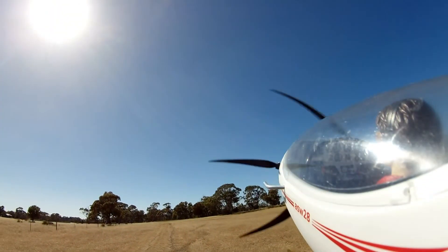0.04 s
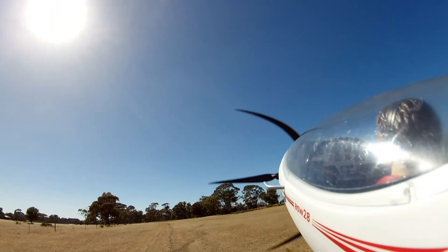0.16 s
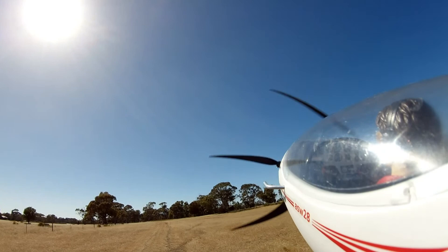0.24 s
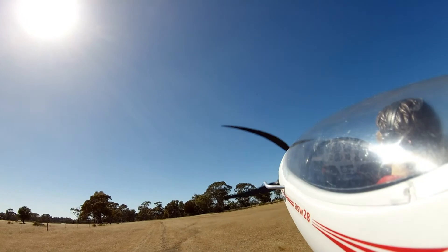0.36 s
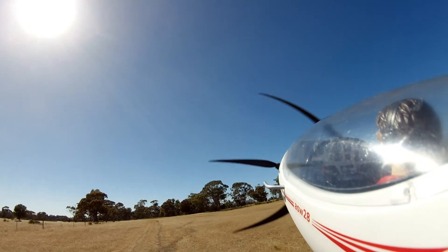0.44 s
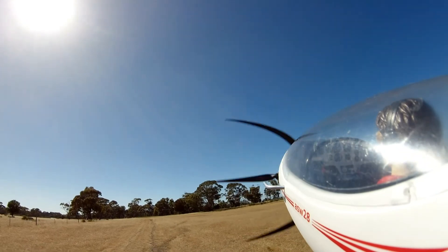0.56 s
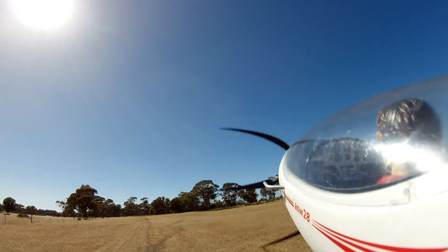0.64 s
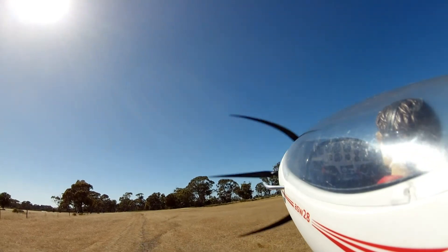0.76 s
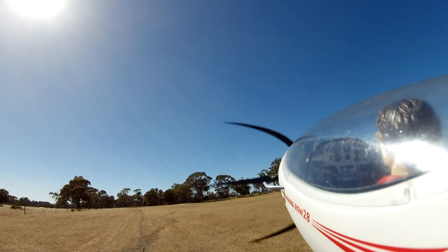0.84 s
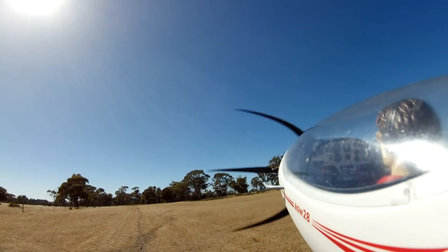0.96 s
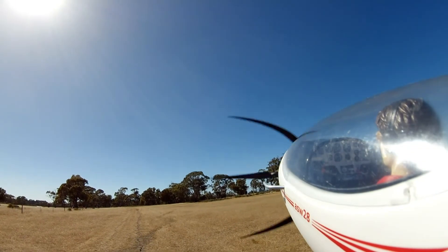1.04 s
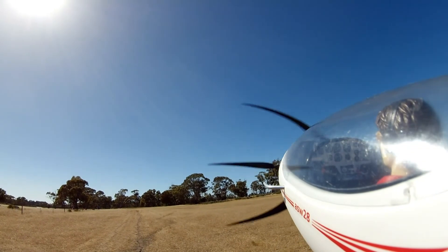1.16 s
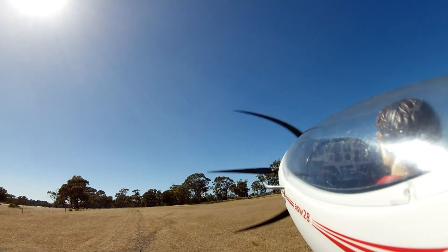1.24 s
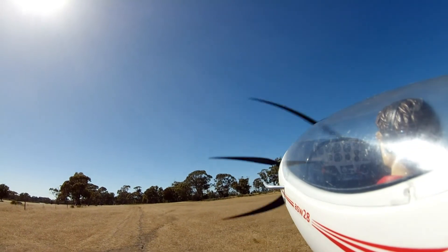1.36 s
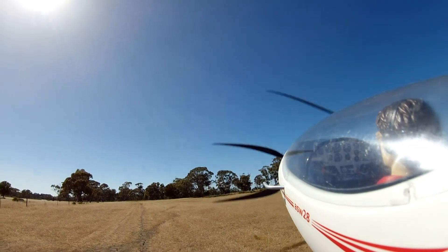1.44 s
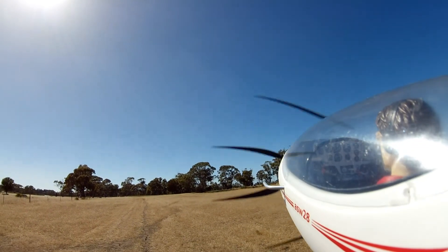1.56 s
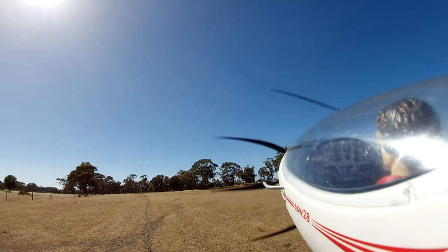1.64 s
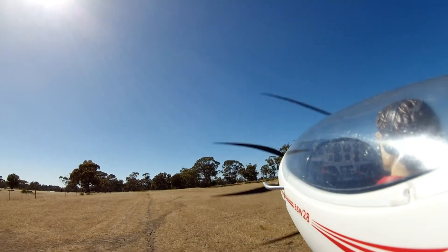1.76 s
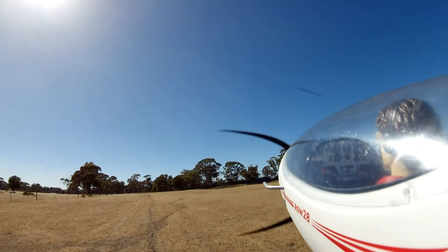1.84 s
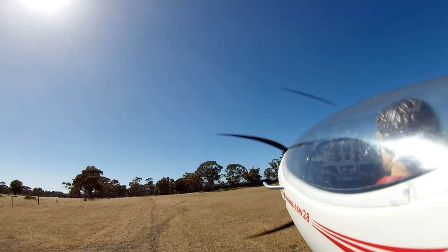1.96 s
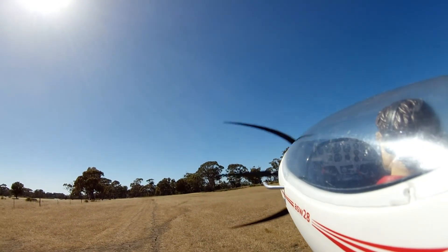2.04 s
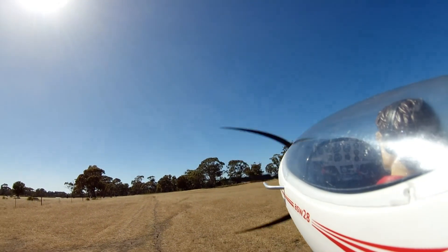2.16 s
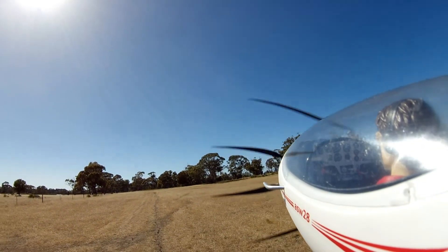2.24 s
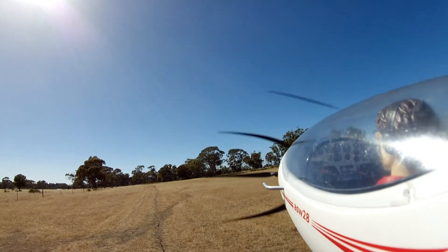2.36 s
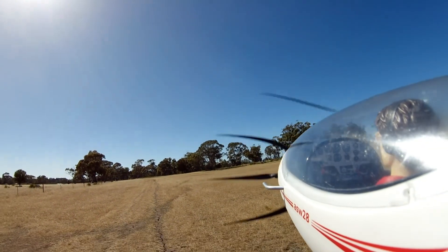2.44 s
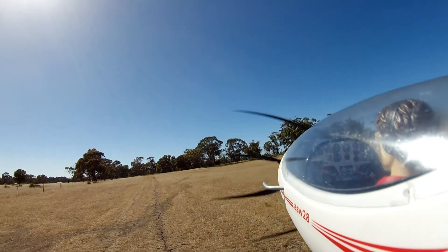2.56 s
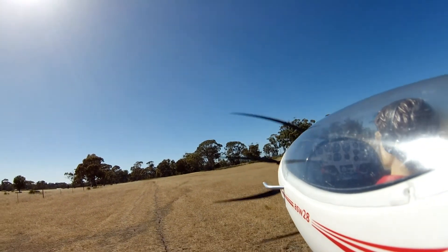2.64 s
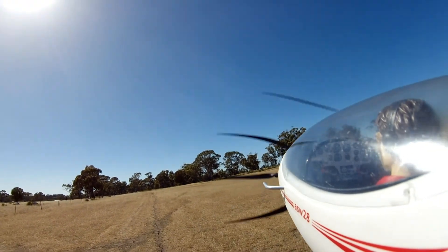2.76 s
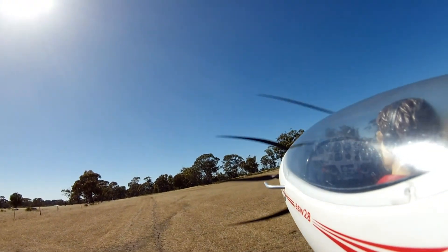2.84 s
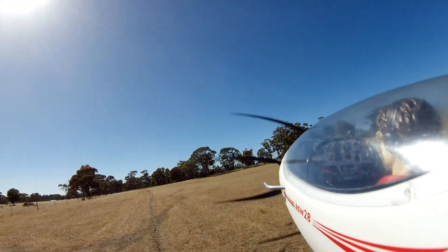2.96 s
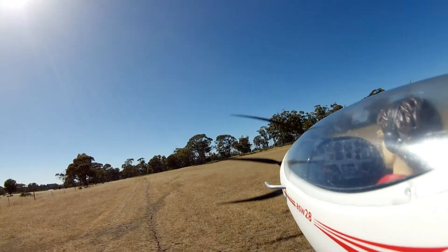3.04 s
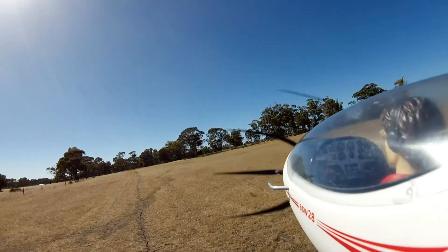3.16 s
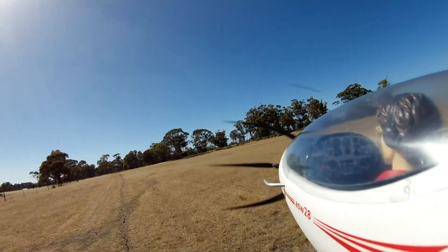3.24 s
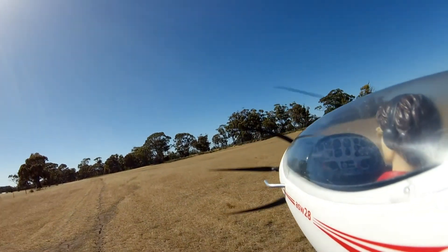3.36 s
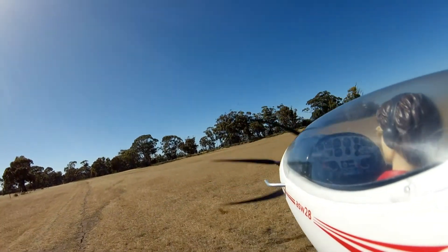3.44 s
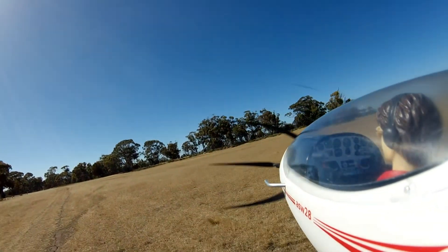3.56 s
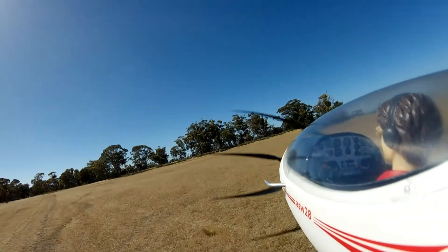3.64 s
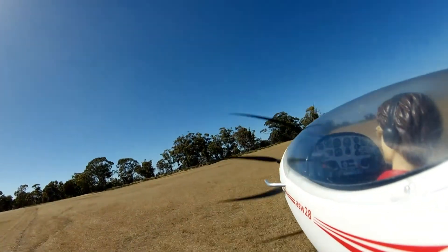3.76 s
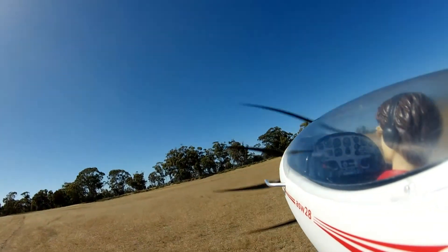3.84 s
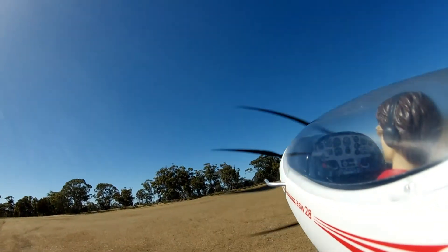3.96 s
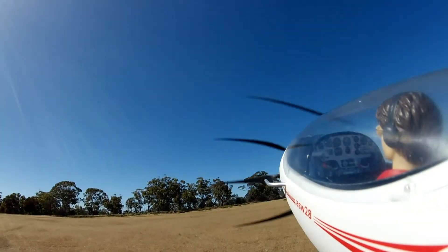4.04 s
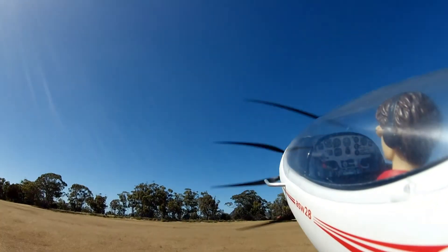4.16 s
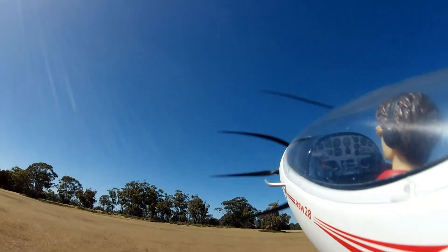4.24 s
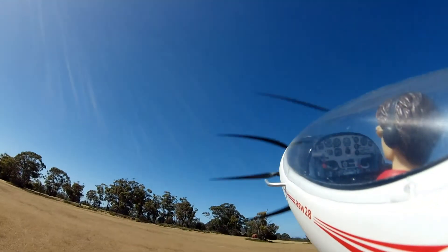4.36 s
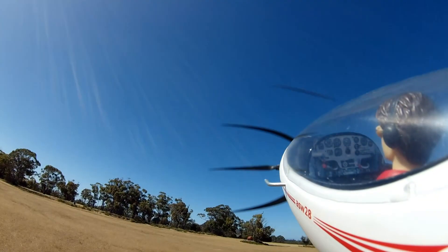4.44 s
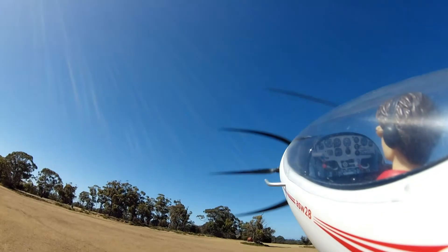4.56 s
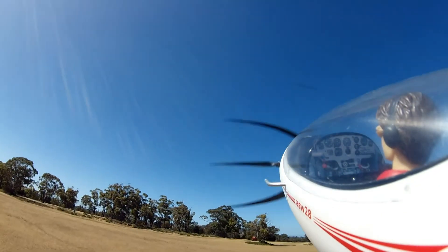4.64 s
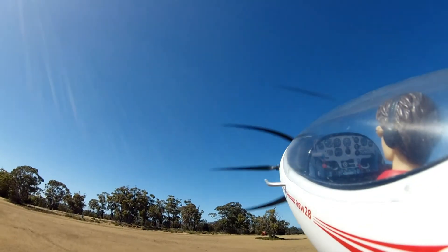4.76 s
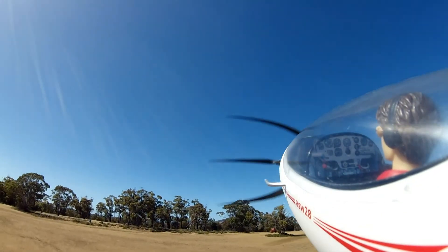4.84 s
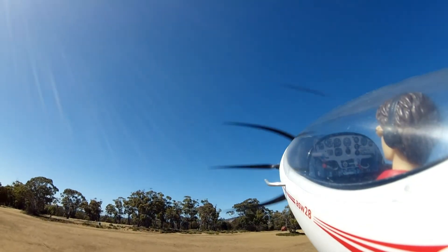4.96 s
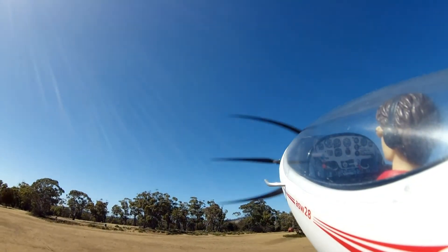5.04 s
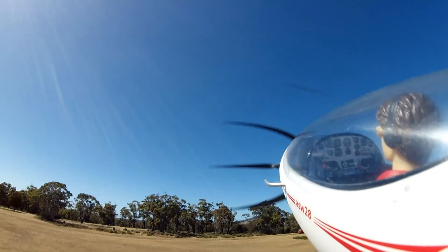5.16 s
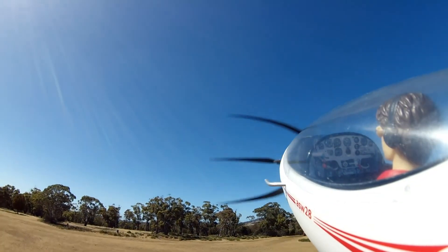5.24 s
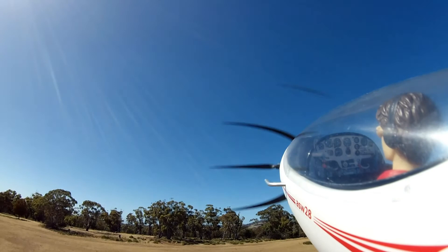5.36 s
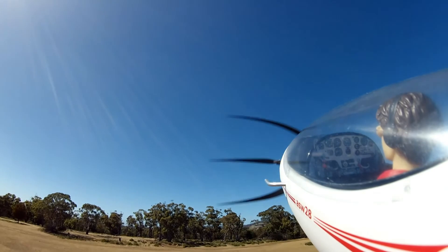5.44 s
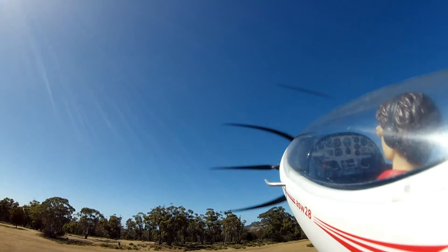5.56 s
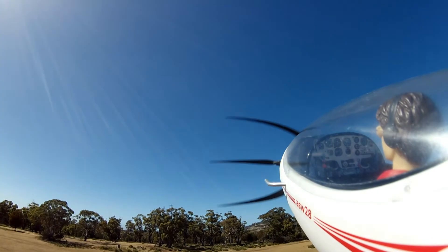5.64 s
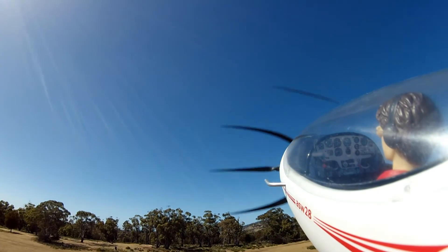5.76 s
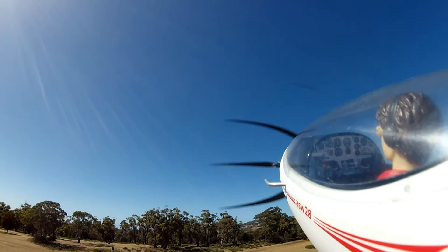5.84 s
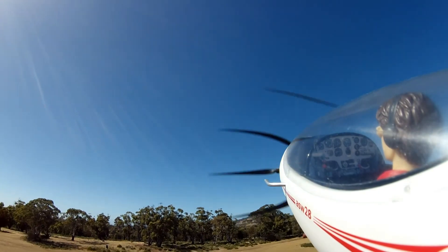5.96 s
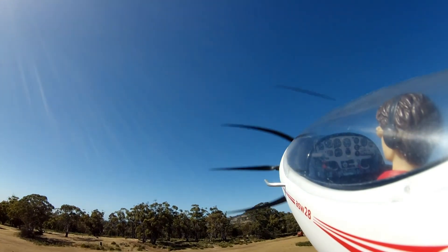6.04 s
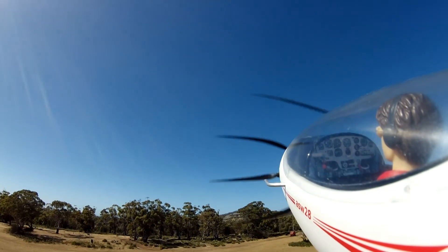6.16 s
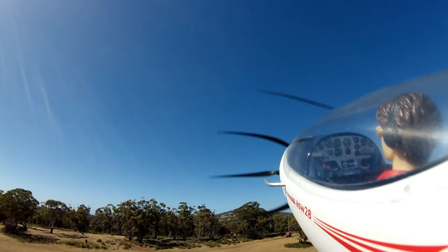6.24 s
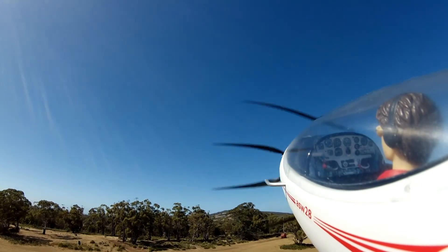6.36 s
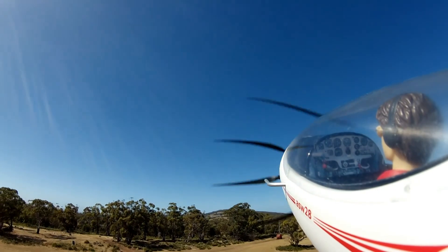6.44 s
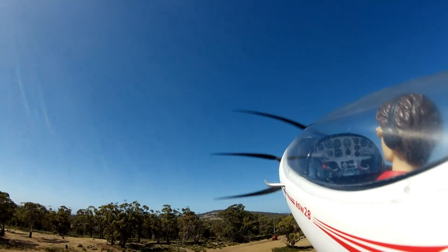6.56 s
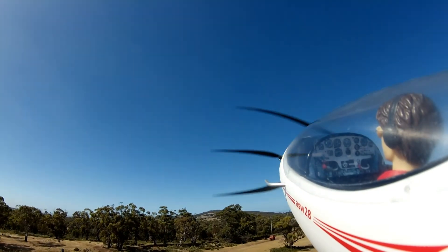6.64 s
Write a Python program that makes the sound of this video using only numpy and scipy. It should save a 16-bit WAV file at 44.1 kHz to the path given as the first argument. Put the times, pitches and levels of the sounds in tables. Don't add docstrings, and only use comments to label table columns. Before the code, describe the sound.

The microphone sits inside a small case on the wing of an electric model glider in an open field, so everything is close, dull and short of treble. At 0 s there is only faint air; by 0.5 s it swells into a soft fluttering rush, with a very short rising motor whine. A small hollow knock sounds at 1.15 s as the craft rolls. The rush gets louder and its flutter faster from 1.5 s, and again at 2.3 s, when a steady low-mid propeller hum enters. Around 3 s it lifts off, with strong roar, frame shudder and gusts. From 3.6 to 4.2 s buzzing wake slaps come raggedly. The hiss eases between about 4 and 5 s as it rolls and climbs. After 5 s a rougher, steadier propeller buzz pulses within the muffled wind until the abrupt end near 6.7 s.

```python
import sys
import numpy as np
from scipy import signal
from scipy.fft import rfft, irfft
from scipy.io import wavfile
from scipy.ndimage import uniform_filter1d

SR = 44100
rng = np.random.default_rng(int(sys.argv[2]) if len(sys.argv) > 2 else 0)


def dump(signal):
    limited = np.clip(np.atleast_2d(signal).T, -1, 1)
    pcm = np.round(limited * 32767).astype(np.int16)
    wavfile.write(sys.argv[1], SR, pcm)


def undo_db(level):
    steps = np.asarray(level, float) / 20
    return 10 ** steps


N = 295029
TIME = np.arange(N) / SR
FREQ = np.arange(N // 2 + 1) * SR / N + 1e-3

AIR_BANDS_HZ = [
    (40, 120),
    (320, 420),
    (920, 1100),
    (1900, 2600),
    (3200, 5500),
]
# frequency in Hz, level in dB per Hz.
PORT_TONE = [(18, -63), (30, -53), (130, -17.5), (201, -7), (240, -3.5), (420, 1), (650, -1.5), (1000, -5),
             (1500, -6)]
# frequency in Hz, level in dB.
CASE_TONE = [(1500, -1), (2000, -12), (2400, -12), (2900, -18.5), (3800, -21), (5000, -32.5), (6000, -47),
             (6500, -63), (7000, -56), (7600, -63), (8100, -56), (9300, -57.5), (10500, -70.5),
             (16000, -94.5)]
# level on the ground in dB, change at lift-off in dB,
# change in the climb in dB, share of a lull that is felt (0-1.5).
AIR_LEVELS = [
    (-10, -8.5, -2.5, 0.7),
    (9, 0, -5, 0.02),
    (7.5, 1.5, -0.5, 1.12),
    (-1.5, 0, 0.2, 1.05),
    (-9, -.5, 0.5, 0.8),
]
LIFT_S, LIFT_LENGTH_S = 3.0, 0.18
CLIMB_S, CLIMB_LENGTH_S = 4.41, 0.37
# start in seconds, slipstream hiss in dB,
# flutter rate in Hz, flutter depth (0-1).
THROTTLE_STEPS = [
    (0, -60.5, 36, 0),
    (.13, -56.5, 38, 0.04),
    (.52, -51.5, 43, 0.23),
    (1.0, -51, 48.5, 0.25),
    (1.47, -47, 58, 0.17),
    (2.3, -42, 72, 0.27),
    (3.03, -41, 145.5, 0.2),
    (3.8, -40.5, 145.5, 0.02),
]
SPOOL_S = .1
# start in seconds, length in seconds, edge in seconds,
# drop of the hiss in dB.
SLIPSTREAM_LULLS = [
    (1.337, 0.2, .04, 0.5),
    (2.716, 0.099, .05, 0.5),
    (3.808, 0.11, .05, 2),
    (4.006, 1, 0.089, 4.5),
    (4.063, 0.057, 0.014, 1.5),
    (4.24, .06, .03, 1.5),
    (4.426, .42, 0.046, 5),
]
# start in seconds, length in seconds, change of rumble, buffet and roar in dB.
WIND_GUSTS = [(.0, .4, 3, -2, -1), (.5, .5, -2, .3, .3), (1.05, .15, -2, 3, .3), (1.5, .2, 3, 1, -1),
              (2.9, .16, 1, 2, -1), (3.1, .1, 5, .3, .3), (3.33, .12, .3, 5, .3), (3.62, .41, -3, -1, 3),
              (4.05, .3, 3, 1, .3), (4.13, .08, .3, 1, 6), (4.25, .2, .3, 2, .3), (4.54, .1, -4, -4, -3),
              (4.8, .14, 4, 5, 2), (5.05, .12, -3, .3, 2), (5.56, .15, -3, 3, .3), (5.42, .14, 0, -1, -2),
              (5.95, .25, 0, -1, -3), (6.45, .3, -1, -2, -2)]
GUST_EDGE_S = 0.027

# start in seconds, length in seconds, level in dB of the octave tone,
# of the odd overtones and of the even overtones.
WAKE_SWINGS = [(3.1, .5, -40, -40, -38), (3.6, .2, -28.5, -30, -32), (3.78, 0.055, -28, -28.5, -35),
               (3.86, .18, -24, -29.5, -30), (4.13, .08, -24, -26, -29.5), (4.3, .75, -32.5, -46, -50),
               (4.82, .2, -30, -44, -48), (5.057, .13, -24, -25.5, -27), (5.05, 1.7, -33, -28.5, -45),
               (5.42, .14, -26.5, -26, -25), (5.75, 0.17, -44.5, -33, -40.5),
               (5.96, .23, -30.5, -26.5, -27), (6.45, 0.037, -24.5, -29, -27.5),
               (6.53, .15, -28, -26.5, -26.5)]
SWING_EDGE_S = .012
# frequency in Hz, level in dB.
SLAP_TONE = [(100, -51), (290, -25), (580, -8.5), (870, 0), (1160, -2.5), (1450, -6.5), (1750, -6.5),
             (2300, -14.5), (4000, -25), (6400, -22.5)]
SLAP_PHASE = .85
VORTEX_STRENGTH = np.clip(rng.standard_normal(int(N / SR * 600)), -3, 1.2)

# time in seconds, blade rate in Hz, hum level in dB.
PROPELLER = [(2.3, 287.4, -39.5), (3.0, 286.5, -33.5), (3.2, 291.4, -30.5), (3.3, 292.6, -26),
             (3.45, 289.8, -34), (4.0, 292.2, -29), (4.3, 292.2, -27.5), (4.7, 291.4, -25),
             (5.05, 290.5, -28), (5.3, 290.5, -22), (5.4, 290, -26), (5.85, 288.3, -21), (6.2, 289.6, -25),
             (6.35, 288.4, -21), (6.47, 284.3, -25.5), (6.69, 292.8, -22)]
# start in seconds, length in seconds, level in dB of the tone at
FRAME_SHAKES = [
    (3.14, 0.5, -35.5, -29.5),
    (3.6, .8, -47, -36),
    (4.8, .2, -58, -31.5),
]
SHAKE_EDGE_S = 0.18
STEADY_SHAFT_DB, STEADY_THIRD_DB = -53.5, -46.5

# time in seconds, pitch in Hz, level in dB.
MOTOR_WHINE = [
    (.42, 3050, -88),
    (.46, 3250, -65),
    (.5, 3500, -60),
    (.54, 3800, -64),
    (.58, 4050, -90),
]
# time in seconds, peak in dB, pitch in Hz, time to fall by 60 dB in seconds.
BELLY_KNOCKS = [
    (1.148, -10, 313, 0.027),
]
# pitch in Hz, level in dB.
ELECTRONIC_WHISTLES = [(2000, -70.5), (4000, -77), (5100, -84), (8000, -110)]
# clock frequency in Hz, level of the mirror image in dB.
MIRROR_CLOCKS = [(7800, -68), (11700, -70)]


def airflow(wake):
    chance = rng.random((3, N))
    bursts = chance[0] < 400 / SR
    big = bursts * np.sign(chance[1] - .45) * undo_db(9.8 * chance[2])
    big = signal.lfilter(*signal.butter(1, 2500, fs=SR), big)
    eddies = rng.standard_normal(N) + undo_db(-10.5) * big / big.std()

    _, flutter_hz, depth = throttle()
    flutter_turns = np.cumsum(flutter_hz * (1 + .02 * walk(12))) / SR
    flutter = 1 + depth * np.cos(2 * np.pi * flutter_turns)
    beat_depth = np.clip(0.27 * (TIME - 2.2), 0, .3)
    blade_beat = 1 + beat_depth * np.cos(2 * np.pi * wake)
    eddies = eddies * blade_beat * flutter * undo_db(0.3 * walk(90))
    heard = rfft(eddies) * response(PORT_TONE) * response(CASE_TONE)

    centres = np.log([low * high for low, high in AIR_BANDS_HZ]) / 2
    out = 0
    for k, db in enumerate(air_db()):
        low, high = AIR_BANDS_HZ[k]
        inside = (FREQ > low) & (FREQ < high)
        rms = np.sqrt(2 * np.sum(abs(heard[inside]) ** 2)) / N
        share = np.interp(np.log(FREQ), centres, np.arange(len(centres)) == k)
        out = out + irfft(heard * share, N) / rms * undo_db(db + 0.25 * walk(30))
    return out


def air_db():
    lull = sum(db * held(s, length, edge) for s, length, edge, db in SLIPSTREAM_LULLS)
    lifted = held(LIFT_S + LIFT_LENGTH_S / 2, N, LIFT_LENGTH_S)
    climbing = held(CLIMB_S + CLIMB_LENGTH_S / 2, N, CLIMB_LENGTH_S)
    stream = throttle()[0]
    bands = [stream + ground + lift * lifted + climb * climbing - share * lull
             for ground, lift, climb, share in AIR_LEVELS]
    gusts = sum(np.outer(db, held(s, length, GUST_EDGE_S)) for s, length, *db in WIND_GUSTS)
    return [band + gust for band, gust in zip(bands, [*gusts, 0, 0])]


def throttle():
    s, *columns = np.transpose(THROTTLE_STEPS)
    step = np.clip(np.searchsorted(s, TIME, "right") - 1, 0, None)
    return [uniform_filter1d(column[step], int(SPOOL_S * SR)) for column in columns]


def slaps(wake):
    _, odd, even = episodes(WAKE_SWINGS, SWING_EDGE_S)
    half = np.floor(2 * wake)
    at = np.flatnonzero(np.diff(half))
    size = even[at] - odd[at] * (-1) ** half[at]
    jitter = (.00006 * SR * rng.standard_normal(len(at))).astype(int)
    moment = np.clip(at + jitter, 0, N - 1)
    train = np.zeros(N)
    np.add.at(train, moment, size * vortex(wake)[at] * SR / (2 * 290 * np.sqrt(2)))
    tone = abs(response(SLAP_TONE) * response(CASE_TONE)) * np.exp(1j * SLAP_PHASE)
    return irfft(rfft(train) * tone, N) * np.clip(TIME - 1, 0, 1)


def vortex(turns):
    spread_db = np.interp(TIME, [4.3, 5], [3.5, 1.6])
    strength = np.interp(turns, np.arange(len(VORTEX_STRENGTH)), VORTEX_STRENGTH)
    return undo_db(spread_db * strength)


def hum(turns, wake):
    shaft, third = episodes(FRAME_SHAKES, SHAKE_EDGE_S)
    octave = episodes(WAKE_SWINGS, SWING_EDGE_S)[0] * vortex(wake)
    rise = np.clip((TIME - 2.2) / 0.21, 0, 1)
    shudder = undo_db(-63) * np.clip(1.5 - abs(TIME - 2.7) / .35, 0, 1)
    passing = np.exp(-((TIME - 3.8) / 0.35) ** 2)
    tones = [(1, undo_db(curves(PROPELLER)[1])), (2, octave), (21, undo_db(-91.5)),
             (1 / 2, np.hypot(shaft, undo_db(STEADY_SHAFT_DB))), (3 / 2, np.hypot(third, undo_db(STEADY_THIRD_DB))),
             (1 / 4, undo_db(7.0) * shudder), (3 / 4, undo_db(21) * shudder), (5 / 2, undo_db(-29.5) * passing)]
    out = np.zeros(N)
    for multiple, gain in tones:
        cycles = multiple * (wake if multiple == 2 else turns)
        waver = undo_db(1.5 * walk(40) + 1.1 * walk(12))
        out += np.sqrt(2) * rise * gain * waver * np.cos(2 * np.pi * cycles + SLAP_PHASE)
    return out


def motor():
    hz, db = curves(MOTOR_WHINE)
    phase = 2 * np.pi * np.cumsum(hz) / SR
    started = TIME > MOTOR_WHINE[0][0]
    return undo_db(db) * started * (np.sin(phase) + undo_db(16.5) * np.sin(phase / 2.1))


def knocks():
    out = np.zeros(N)
    for s, db, hz, t60 in BELLY_KNOCKS:
        t = np.clip(TIME - s, 0, None)
        attack = 1 - np.exp(-t / 0.0028)
        out += undo_db(db) * np.sin(2 * np.pi * hz * t) * attack * undo_db(-60 * t / t60)
    return out


def curves(table):
    s, *columns = np.transpose(table)
    return [uniform_filter1d(np.interp(TIME, s, column), size=250) for column in columns]


def response(points):
    hz, db = np.transpose(points)
    level = undo_db(np.interp(np.log(FREQ), np.log(hz), db))
    cepstrum = irfft(np.log(level), N)
    cepstrum[1:N // 2] *= 2
    cepstrum[N // 2 + 1:] = 0
    return np.exp(rfft(cepstrum))


def walk(rate):
    k = int(SR / rate)
    steps = np.repeat(rng.standard_normal(N // k + 1), k)
    smooth = uniform_filter1d(uniform_filter1d(steps, k), k)[:N]
    return smooth / smooth.std()


def held(start, length, edge):
    nearest_end = np.minimum(TIME - start, start + length - TIME)
    return np.clip(nearest_end / edge + .5, 0, 1)


def episodes(table, edge):
    power = sum(np.outer(undo_db(np.array(db)) ** 2, held(s, length, edge) ** 2) for s, length, *db in table)
    return np.sqrt(power)


def scene():
    turns = np.cumsum(curves(PROPELLER)[0] * (1 + .002 * walk(30))) / SR
    wake = turns + .02 * walk(25) + .06 * walk(9)
    return (airflow(wake) + slaps(wake) + hum(turns, wake) + motor() + knocks())[None]


def band_limit(x):
    return signal.sosfilt(signal.butter(12, 15750, fs=SR, output="sos"), x)


def record(dry):
    x = signal.sosfilt(signal.butter(2, 60, "high", fs=SR, output="sos"), dry)
    x = signal.lfilter(*signal.iirnotch(699, 699 / 45, fs=SR), x)
    x = x + sum(undo_db(db) * x * np.cos(2 * np.pi * hz * TIME) for hz, db in MIRROR_CLOCKS)
    x = x + sum(undo_db(db) * np.sin(2 * np.pi * hz * TIME) for hz, db in ELECTRONIC_WHISTLES)
    x = x + undo_db(-92.5) * rng.standard_normal(x.shape)
    x = x * np.clip((N / SR - TIME) / .001, .7, 1)
    return band_limit(x)


dry = scene()
out = record(dry)
dump(out)
```